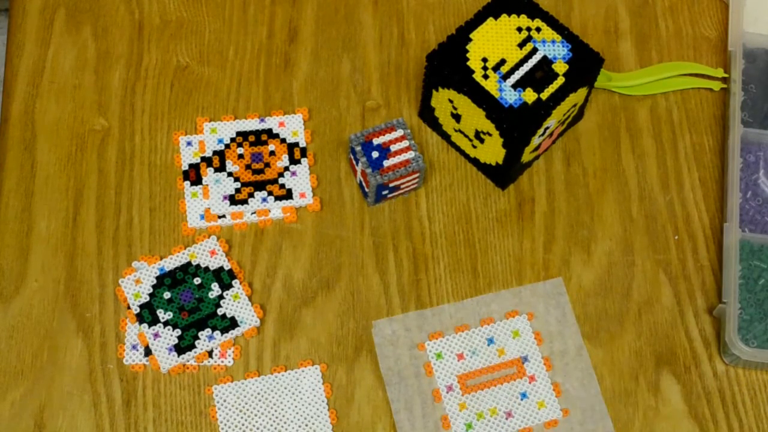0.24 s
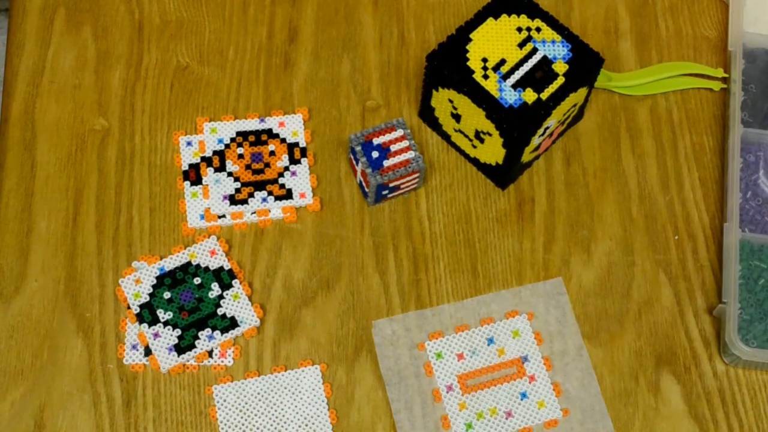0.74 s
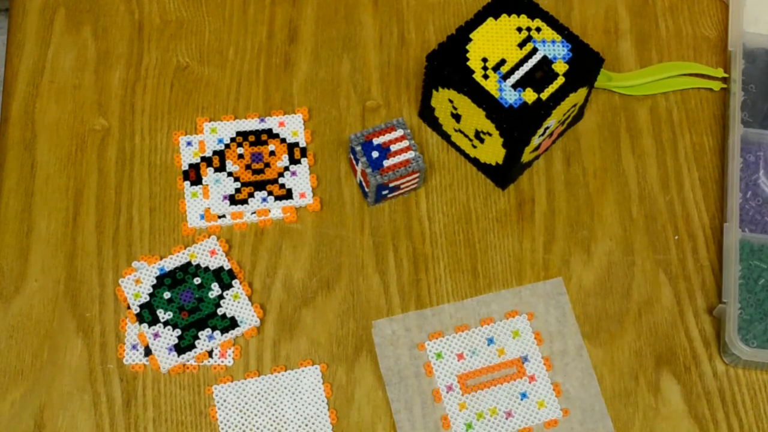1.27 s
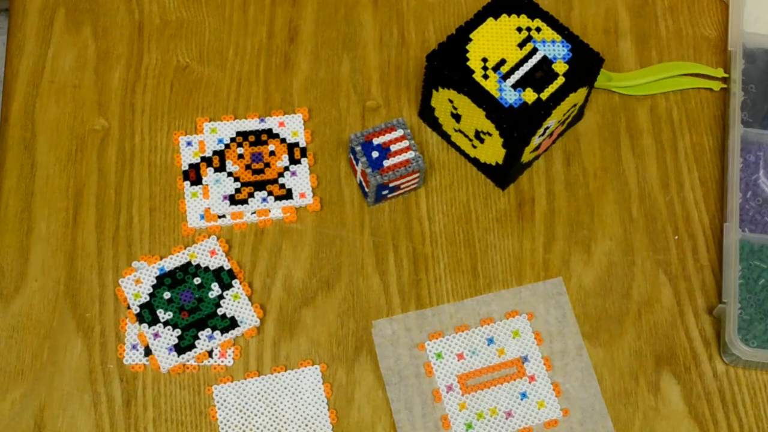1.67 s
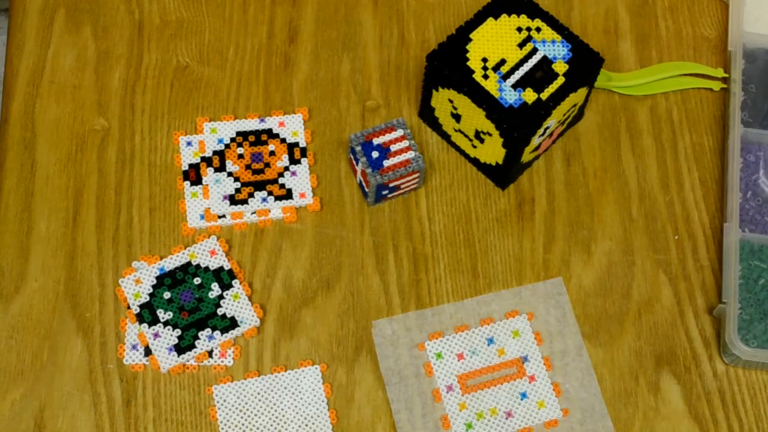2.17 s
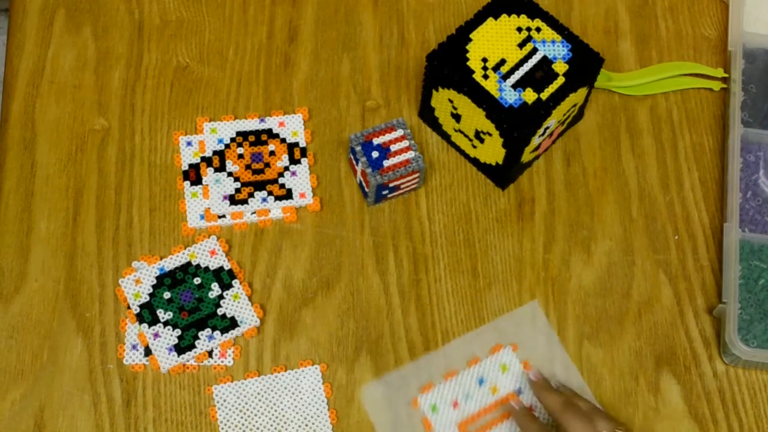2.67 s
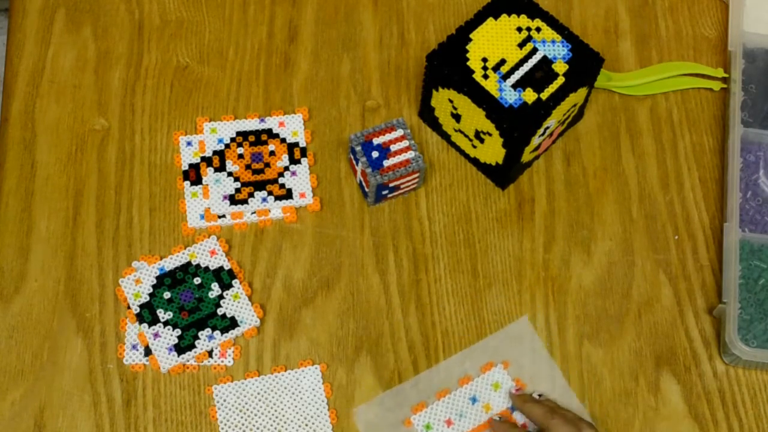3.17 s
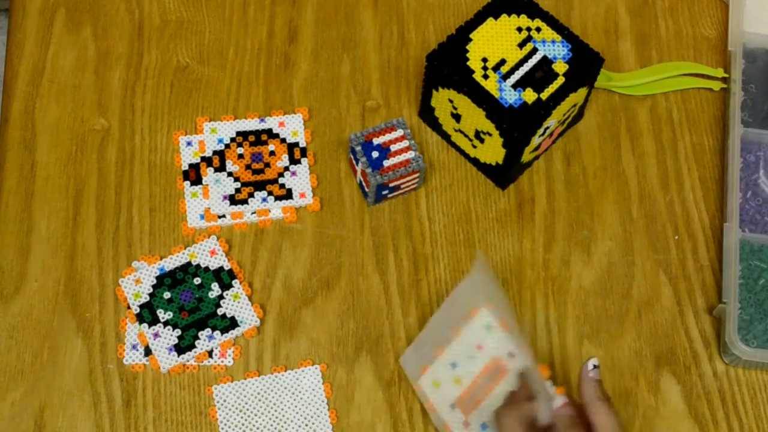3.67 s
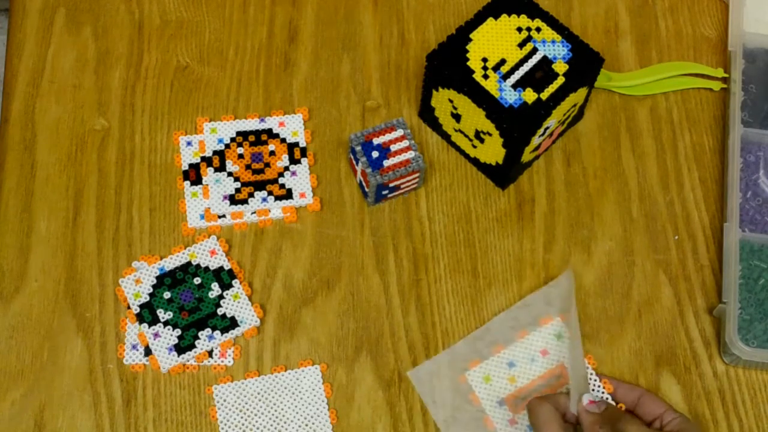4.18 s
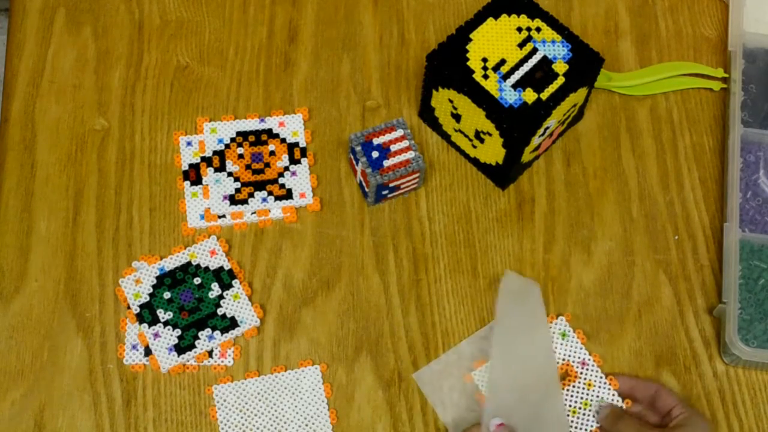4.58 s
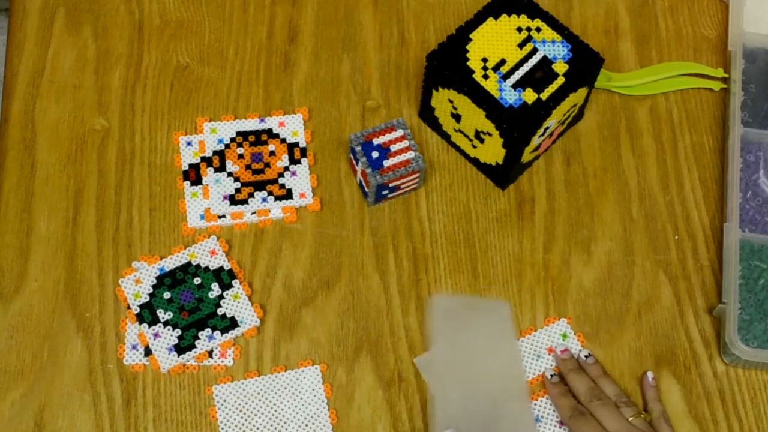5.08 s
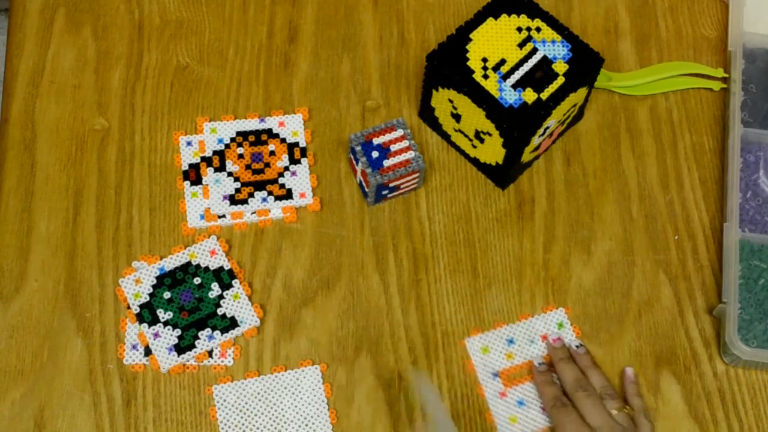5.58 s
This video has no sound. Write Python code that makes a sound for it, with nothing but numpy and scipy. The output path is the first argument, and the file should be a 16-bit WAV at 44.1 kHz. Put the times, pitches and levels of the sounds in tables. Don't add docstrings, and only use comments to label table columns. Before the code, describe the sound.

Baking parchment crinkles in hands, quiets to a faint slide, then is peeled off fused plastic beads with sharp, dense crackling and ticking.

```python
import sys
import numpy as np
from scipy import signal
from scipy.fft import rfft, irfft, next_fast_len
from scipy.io import wavfile
from scipy.ndimage import uniform_filter1d, map_coordinates

SR = 44100
rng = np.random.default_rng(int(sys.argv[2]) if len(sys.argv) > 2 else 0)


def pcm_store(signal):
    levels = np.round(np.clip(np.atleast_2d(signal), -1, 1) * 32767)
    wavfile.write(sys.argv[1], SR, levels.astype(np.int16).T)


def ratio_of_db(decibels):
    return 10 ** (np.asarray(decibels, float) / 20)


N = 257103


def unit(x):
    return x / np.sqrt(np.mean(x ** 2) + 1e-20)


def along(points, hz):
    f, v = np.transpose(points)
    return np.interp(np.log(hz + 1), np.log(f + 1), v)


def wobble(rate):
    knots = rng.standard_normal(int(N * rate / SR) + 4)
    return map_coordinates(knots, [np.arange(N) * rate / SR])


def coloured(x, gain_db):
    m = 2 * next_fast_len(len(x) // 2 + 4096)
    gain = ratio_of_db(gain_db(np.fft.rfftfreq(m, 1 / SR)))
    cepstrum = irfft(np.log(gain + 1e-6), m)
    cepstrum[1:m // 2] *= 2
    cepstrum[m // 2 + 1:] = 0
    return irfft(rfft(x, m) * np.exp(rfft(cepstrum)), m)[:len(x)]


def add_at(track, s, sound):
    track[round(s * SR):][:len(sound)] += sound


# (frequency [Hz], density [dB per Hz])
AIR = [(25, -21), (48, -15.5), (178, -6), (300, -3), (600, -3), (1000, -5), (2000, -9), (4000, -20),
       (8000, -29), (11000, -35), (15500, -46)]
# (frequency [Hz], level [dB rms])
HUM = [(120, -96), (212, -78), (240, -71.5), (360, -75)]
# (time [s], level [dB])
SHIFTING = [
    (0.0, -64),
    (0.45, -53),
    (1.35, -67.5),
    (2.94, -70),
    (3.44, -63),
    (4.35, -71),
    (5.83, -77),
]


def air():
    t = np.arange(N) / SR
    hum = 0
    for hz, db in HUM:
        level = ratio_of_db(db - 3.0 + 3.1 * wobble(9.9))
        hum = hum + level * np.sin(2 * np.pi * hz * t + 1.6 * wobble(11))
    steady = ratio_of_db(-64.5) * unit(coloured(rng.standard_normal(N), lambda hz: along(AIR, hz)))
    mid_range = [(120, -42), (300, -3.5), (480, 3), (1100, -33.0)]
    shifting = unit(coloured(rng.standard_normal(N), lambda hz: along(mid_range, hz)))
    return steady + ratio_of_db(np.interp(t, *np.transpose(SHIFTING)) - 7.5) * shifting + hum


def releases(n, uneven_db):
    sizes_db = uneven_db * np.minimum(rng.exponential(size=n), 5.5)
    return unit(rng.standard_normal(n) * ratio_of_db(sizes_db))


def patchy(x, depth_db):
    z = signal.stft(x, nperseg=256)[2]
    field = uniform_filter1d(rng.standard_normal(z.shape), 5, 0)
    field = uniform_filter1d(field, 9, 1)
    return signal.istft(z * ratio_of_db(depth_db * unit(field)), nperseg=256)[1][:len(x)]


# (peak time [s], rustle level [dB], fade T60 [s], body over rustle [dB], fizz over rustle [dB])
STROKES = [(0.2, -56, 3.5, -7, -22), (0.43, -35.5, 0.81, -9, 5.5), (0.812, -41, 4.3, -15, -3),
           (0.905, -42.5, 0.85, -6, 2), (1.03, -46, 0.42, -18, 1), (1.17, -38, 1.0, -11, 5),
           (1.47, -58.5, 0.68, -5, 7), (1.65, -48, 0.9, -16, 3), (1.72, -44.5, 0.71, -10, -3),
           (1.81, -51.5, 1.2, -7, 4), (3.27, -50.5, 1.7, -4, 1), (3.42, -47, 2.9, -10, -9),
           (3.55, -38, 0.36, -5.5, 8), (3.7, -37.5, 0.75, -10, -1), (3.79, -45, .5, -6, -6),
           (3.875, -34, 0.4, -14.5, -4), (4.009, -36.5, 0.17, -4, 6), (4.1, -32.5, 0.5, -19, -4),
           (4.27, -55.5, 0.45, -16, 12.5), (4.53, -40.5, 1.13, -10, 3.5), (4.65, -59, 0.65, 3, -1),
           (5.1, -38, 0.48, -11.5, 7.5), (5.29, -45.5, 1.7, -10, 10.5), (5.42, -38, 0.5, -15, 3)]
# (peak time [s], rustle level [dB], fade T60 [s], body over rustle [dB], fizz over rustle [dB])
JERKS = [(0.0, -44, 0.44, -15, 2.5), (2.995, -59, 2.2, -10.5, 4), (1.325, -54, 0.53, -3, 12),
         (0.085, -57.5, 0.36, -14, 21.5), (0.555, -45.5, 1.1, -2, 13), (1.063, -50.5, 0.39, 7.5, -12),
         (1.125, -51, .7, -5, -7), (1.975, -58, 0.29, 1, 6), (2.335, -57, 0.8, 1, -20),
         (3.821, -38, 2.3, -5, -8), (3.61, -45, .6, -10, 7), (4.141, -30.5, 0.43, -6.5, -6),
         (4.838, -36.5, 0.29, -3, -3), (4.975, -41, 1.3, -13, -2), (5.57, -50.5, 0.7, -6.5, 5.5),
         (5.76, -52.5, 1, -2, -9), (3.925, -32, .4, -8, -2), (1.548, -52, .9, -10, 2),
         (0.77, -40, .35, -10, 2), (4.372, -48, .4, -6, -4), (4.65, -44, .45, -4, -6),
         (3.698, -46, .4, -10, 2), (3.33, -44, .4, -10, -4), (0.305, -42, .6, -6, 2)]


def strokes():
    s, db, fade, body_db, fizz_db = np.transpose(STROKES + JERKS)[:, :, None]
    t = np.arange(0, N + 64, 64) / SR
    rise = np.clip(0.52 * fade, .02, 0.55)
    rise[len(STROKES):] = 0.058
    slide_from, slide_to, slide_edge_s = 2.46, 2.892, 0.36
    outside = np.maximum(0, np.maximum(slide_from - t, t - slide_to))
    slide_db = -61.5 - 60 * outside / slide_edge_s
    rest_db = -84

    def total(over_db, slide_over_db, fade_share):
        fall = np.maximum(fade_share * fade, .05)
        level_db = db + over_db - 60 * np.where(t < s, (s - t) / rise, (t - s) / fall)
        power = (ratio_of_db(level_db) ** 2).sum(axis=0)
        power = power + ratio_of_db(slide_db + slide_over_db) ** 2 + ratio_of_db(rest_db + np.min(over_db)) ** 2
        return np.interp(np.arange(N) / SR, t, 10 * np.log10(power))

    return total(0, 0, 0.74), total(body_db, -12, 0.63), total(fizz_db, 8, 0.5)


# (frequency [Hz], gain [dB])
SHEET = [(500, -36.5), (1000, -9), (1700, -0.5), (3000, -2.5), (5000, -10.5), (9000, -29)]
# (frequency [Hz], gain [dB])
BODY = [(150, -68), (400, -6.5), (800, 0.5), (1200, 2.5), (2200, -37.5)]
# (frequency [Hz], gain [dB])
FIZZ = [(2000, -31), (4500, 5), (7000, 1.5), (9500, -0.5), (11000, -6.5), (15000, -9.5)]


def rustle():
    sheet_db, body_db, fizz_db = strokes()
    grip = np.clip((sheet_db + 76.5) / 22, .15, 1)
    clumps = ratio_of_db(grip * np.clip(2.5 * wobble(29.867) + 4.0 * wobble(140), -11, 6))

    def layer(points):
        stream = patchy(clumps * releases(N, uneven_db=3.0), depth_db=2.2)
        return unit(coloured(stream, lambda hz: along(points, hz)))

    sheet = ratio_of_db(sheet_db) * layer(SHEET)
    body = ratio_of_db(body_db) * layer(BODY)
    return sheet + body + ratio_of_db(fizz_db - 8.5) * layer(FIZZ)


def crack(t, t60):
    burst = ratio_of_db(-60 * t / t60) * (1 - np.exp(-t / 0.0002)) * rng.standard_normal(len(t))
    return burst / np.abs(burst).max()


# (time [s], crack peak [dB], pocket [Hz], shower over crack [dB])
LOOSE = [(0.0587, -40.5, 4480, -10), (0.0757, -33, 2583, -7.5), (0.3057, -30, 1890, 0),
         (0.397, -29, 2500, -9), (0.6669, -29, 3030, -11), (0.7678, -21, 3100, -9), (0.8589, -33, 2300, -5),
         (0.9311, -22, 1760, -14), (1.1494, -24, 1920, -10.5), (1.3188, -38, 980, -10),
         (1.426, -38.5, 2300, -8), (1.55, -42, 1630, -10), (1.6002, -42.5, 2440, 3),
         (1.682, -34, 1920, -12), (1.7497, -40, 2840, -3), (1.857, -42, 1760, -14),
         (0.0105, -43, 1900, -10), (0.5522, -37, 1810, -12), (0.9435, -28.5, 1880, -12),
         (1.13, -32, 1920, -16), (1.191, -35, 1900, -17)]
# (time [s], crack peak [dB], shower over crack [dB],
# shower T60 [s])
FLAT = [(0.2982, -35.5, -0.5, 0.55), (0.412, -21.5, -15, 0.25), (0.5483, -24.5, -7, 0.25),
        (0.656, -29.5, -6, 0.16), (0.749, -30.5, -3, 0.097), (0.7777, -22, -10, 0.07),
        (0.9425, -26.5, -8, 0.065), (1.6191, -37, -4, 0.13), (1.916, -44, -10, 0.17),
        (1.9709, -46, -2, 0.11), (3.2125, -30, -20, 0.15), (3.3645, -33, -7, 0.15),
        (3.5303, -13.5, -11, 0.07), (3.5438, -16, -17, 0.12), (4.2847, -33, -11, 0.11),
        (4.515, -24, -11, 0.14), (4.524, -22, -19, 0.1), (4.59, -30, -12, 0.15), (4.7493, -31, -18, 0.17),
        (4.802, -35, -8, 0.11), (4.8225, -27, -9, 0.06), (4.8357, -23.5, -9.5, 0.069),
        (5.004, -32.5, -15, 0.13), (5.1737, -25, -19, .17), (5.2447, -35, -14, 0.17),
        (5.2952, -27.5, -14, 0.25), (5.396, -27, -10.5, 0.22), (5.568, -37, -20, 0.26),
        (5.7886, -31, -10, 0.095), (0.2572, -50, -10, .08), (1.028, -37, -10, .08), (1.7815, -36, -16, .06),
        (1.8623, -41.5, -8, 0.094), (3.2956, -41, -16, .06), (3.3313, -30, -14, .06),
        (3.6565, -32.5, -14, .08), (4.2122, -28, -14, .06), (4.2909, -34.5, -15, 0.07),
        (4.4487, -32.5, -7, .08), (4.9325, -43, -11, .06), (5.0662, -31, -15, 0.053), (5.3706, -25, -8, .1),
        (5.5116, -35, -9, 0.068), (5.611, -45, -12, 0.084), (3.877, -23, -7, 0.069),
        (3.931, -20, -21, 0.055), (0.7838, -24, -17, 0.052), (1.1265, -26, -15, .06),
        (4.559, -27, -12, .06)]
# (time [s], crack peak [dB], pocket [Hz], shower over crack [dB])
POPS = [
    (1.1194, -29, 1880, -2),
    (3.2406, -36.5, 2260, -13),
    (3.3259, -26.5, 1860, -26),
    (3.7614, -32.5, 1270, -10.5),
    (3.8217, -32, 1570, -3.5),
    (4.0846, -31.5, 1500, -9),
    (4.1362, -17, 1750, -9),
    (4.3696, -37, 1596, -2),
    (4.7008, -27, 2420, -11.5),
    (4.8427, -30, 2030, -6),
]
# (time [s], crack peak [dB], pocket [Hz], shower over crack [dB])
PEELED = [(3.2338, -29, 3900, -18), (3.3223, -27, 1380, -19), (3.3788, -19.5, 1700, -20.5),
          (3.4143, -20, 1800, -15), (3.4625, -29, 1450, -7), (3.4994, -27.5, 1080, -6.5),
          (3.5136, -24, 1310, -7), (3.695, -30.5, 2960, -14), (3.7264, -29, 1920, -31),
          (3.83, -28, 2950, -7), (3.8455, -23.5, 1820, -3.5), (3.9203, -13.5, 1620, -14),
          (3.9792, -24.5, 1570, -12.5), (4.0688, -33, 1780, -8), (4.1052, -25, 2880, -25),
          (4.1526, -15.5, 1650, -16), (4.1637, -14, 1747, -16), (4.4566, -35, 2150, -8),
          (4.546, -27, 2940, -16), (4.6403, -34, 1700, -3), (4.9721, -31, 1380, -17),
          (5.0721, -30.5, 3180, -3), (5.3438, -29, 3700, -8), (5.3722, -34, 1590, -11),
          (5.462, -28, 3630, -32), (5.5009, -36, 2130, -32), (5.7536, -33, 3110, -7),
          (3.5283, -22, 1520, -17), (4.1755, -24, 1700, -21), (4.185, -27, 1540, -25),
          (4.196, -28, 1590, -21), (4.21, -27, 1770, -28), (4.3815, -40, 1600, -11),
          (4.399, -39, 1600, -11), (4.7065, -30, 2430, -21), (5.2865, -40, 1486, -13),
          (5.3795, -37, 1690, -14), (5.4225, -32, 2030, -9), (5.5795, -54, 1500, -17),
          (5.621, -48, 2100, -15), (5.7635, -37, 1500, -14)]


def creases():
    snapped = [(s, db, 2340, -34, shower_db, t60) for s, db, shower_db, t60 in FLAT]
    for rows, ring_db, t60 in [(LOOSE, 0.5, 0.1), (PEELED, 1, 0.14), (POPS, 7.5, 0.1)]:
        snapped += [(s, db, hz, ring_db, shower_db, t60) for s, db, hz, shower_db in rows]
    return snapped


# (frequency [Hz], gain [dB])
CRACK = [(300, -34.5), (800, -6.5), (1700, 1), (3000, 2), (6000, -4.5), (9500, -11.5), (11000, -14),
         (15000, -20)]


def snaps():
    cracks, pockets = np.zeros(N + SR), np.zeros(N + SR)
    t = np.arange(SR // 3) / SR
    short = t[:SR // 40]
    stutter = np.tile(wobble(260), 2)
    for s, db, hz, pocket_db, shower_db, t60 in creases():
        swell = 1 - np.exp(-t / 0.0051)
        sparse = np.clip(-shower_db / 14, .3, 1.3)
        lumps = ratio_of_db(np.clip(3.8 * sparse * stutter[round(s * SR):][:len(t)], -14, 8))
        fade = ratio_of_db(shower_db - 60 * t / max(t60, .02))
        shower = fade * swell * lumps * releases(len(t), uneven_db=3.5)
        add_at(cracks, s, ratio_of_db(db) * (crack(t, t60=0.008) + shower))

        second_hz = hz * rng.uniform(0.88, 1.21)
        pair = np.sin(2 * np.pi * hz * short) + 0.5 * np.sin(2 * np.pi * second_hz * short)
        ring = ratio_of_db(-60 * short / 0.011) * (1 - np.exp(-short / 0.00094)) * pair
        push = (t == 0) + 0.13 * shower
        add_at(pockets, s, ratio_of_db(db + pocket_db) * signal.fftconvolve(push, ring)[:len(t)])
    return coloured(cracks[:N], lambda hz: along(CRACK, hz) + 4), pockets[:N]


# (time [s], peak [dB], knock [Hz], thud over knock [dB])
KNOCKS = [(0.417, -42, 1043, -18), (0.766, -39.5, 1014, -8), (1.058, -34.5, 710, -18),
          (2.328, -36.5, 786, -19), (3.239, -46, 905, -19), (3.498, -39, 1010, -22), (3.629, -42, 720, -13),
          (4.369, -52.5, 1095, -14), (4.838, -35.5, 986, -4.5), (4.849, -37, 1204, -15),
          (4.949, -43.5, 752, -9), (5.257, -45.5, 654, -21), (0.303, -42.5, 605, -8),
          (0.931, -44.5, 743, -15), (3.385, -49, 785, -12), (3.463, -42.5, 850, -16),
          (3.938, -42, 800, -20), (4.157, -42, 713, -10), (4.976, -45, 810, -14)]


def knocks():
    top, t = np.zeros(N + SR), np.arange(SR // 4) / SR
    for s, db, hz, thud_db in KNOCKS:
        modes = 0
        for ratio in (.7, 1, 1.15):
            modes = modes + ratio_of_db(rng.normal(0, 0.68)) * np.sin(2 * np.pi * hz * ratio * t)
        dull = [(250, -30), (hz, 8), (1.6 * hz, -4), (3.2 * hz, -8), (6 * hz, -40)]
        scuff = coloured(rng.standard_normal(len(t)), lambda f: along(dull, f))
        low_modes = [(150, 1), (330, 0.86), (480, 0.74)]
        thud = ratio_of_db(thud_db) * sum(a * np.sin(2 * np.pi * f * t) for f, a in low_modes)
        envelope = ratio_of_db(db - 2.5 - 60 * t / 0.055) * (1 - np.exp(-t / 0.0027))
        add_at(top, s, envelope * (0.66 * modes + 3.5 * scuff + thud))
    return top[:N]


# (time [s], peak [dB], centre [Hz])
TICKS = [(0.412, -22, 5100), (0.5868, -26.5, 6670), (0.8484, -41, 4500), (0.879, -43, 4600),
         (2.367, -51, 8500), (2.4514, -53, 9050), (2.461, -34.5, 4860), (2.836, -47, 5570),
         (2.8605, -37, 6000), (2.865, -39.5, 6250), (3, -43, 2980), (3.0305, -40, 6000),
         (3.0696, -43, 4200), (3.109, -38.5, 3300), (3.1875, -34.5, 4800), (3.421, -40, 4500),
         (3.438, -32, 5140), (3.4814, -27, 4600), (3.497, -32, 5560), (4.342, -44, 5490),
         (4.429, -32, 4470), (4.4584, -33, 4640), (4.5015, -28, 5100), (4.7448, -35, 5450),
         (4.9823, -31.5, 5000), (5.005, -29, 4600), (5.217, -39, 7380), (5.229, -36, 6400),
         (5.328, -35, 5300), (5.3958, -22, 5100)]


def ticks():
    bonds, t = np.zeros(N + SR), np.arange(SR // 50) / SR
    for s, db, hz in TICKS:
        tone = 0.31 * ratio_of_db(-60 * t / 0.0057) * np.sin(2 * np.pi * hz * t)
        bright = [(.25 * hz, -7), (0.88 * hz, 1.5), (2.9 * hz, -3)]
        snap = coloured(crack(t, t60=0.0047), lambda f: along(bright, f))
        add_at(bonds, s, ratio_of_db(db + 3.0) * (snap + tone))
    plastic = [(800, -11), (2500, 3), (5500, 3.5), (15000, -3.5)]
    return coloured(bonds[:N], lambda hz: along(plastic, hz))


# (frequency [Hz], T60 [s])
ROOM = [(300, 0.24), (2000, 0.36), (6000, 0.23), (14000, 0.14)]
# (delay [s], level [dB])
WALLS = [(.0045, -13), (.0095, -13.5), (0.015, -22), (0.029, -12)]


def room(x):
    heard, hop = np.zeros(N + SR), SR // 25
    noise = rng.standard_normal((N // hop + 1, SR // 4))
    hz, t, z = signal.stft(noise, SR, nperseg=256)
    decay = ratio_of_db(-60 * t / along(ROOM, hz)[:, None])
    tails = signal.istft(z * decay, SR, nperseg=256)[1]
    tails *= 1 - np.exp(-np.arange(tails.shape[1]) / (0.00085 * SR))
    tails *= ratio_of_db(-4.5) / np.linalg.norm(tails, axis=1, keepdims=True)
    for delay, db in WALLS:
        tails[:, round(delay * SR)] += ratio_of_db(db) * rng.uniform(-1.15, 1, len(tails))
    pieces = np.pad(x, (0, len(tails) * hop - N)).reshape(-1, hop)
    for k, answer in enumerate(signal.fftconvolve(pieces, tails, axes=1)):
        heard[k * hop:][:len(answer)] += answer
    return heard[:N]


# (frequency [Hz], gain [dB])
NO_BASS = [(40, -44), (120, -14), (300, -1)]


def scene():
    rubbing = ratio_of_db(-5.0) * rustle()
    cracks, pockets = ratio_of_db(2.0) * np.array(snaps())
    near = rubbing + cracks + ratio_of_db(2.0) * knocks()
    beads = ticks()
    heard = near + pockets + beads + room(near + 0.8 * pockets + 0.75 * beads)
    return (coloured(heard, lambda hz: along(NO_BASS, hz)) + air())[None]


def band_limit(x):
    return signal.sosfilt(signal.butter(12, 16650, fs=SR, output="sos"), x)


# (centre [Hz], width [Hz], depth [dB])
DIPS = [(7870, 490, -6), (12000, 2700, -17)]


def record(dry):
    def response(hz):
        dips = sum(db * np.exp(-(2 * (hz - centre) / width) ** 2) for centre, width, db in DIPS)
        first_step = -33 * np.clip((hz - 15850) / 60, 0, 1)
        last_step = -50 * np.clip((hz - 16520) / 80, 0, 1)
        return dips + first_step + last_step

    mix = coloured(dry[0], response)[None]
    return band_limit(mix)


dry = scene()
out = record(dry)
pcm_store(out)
```